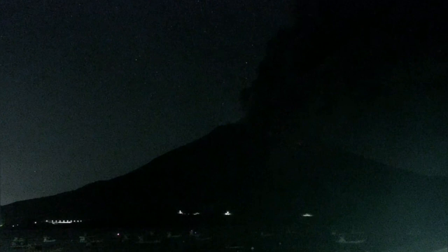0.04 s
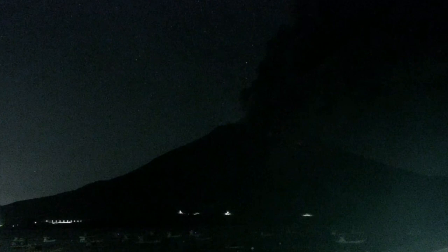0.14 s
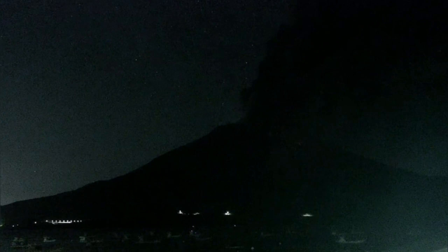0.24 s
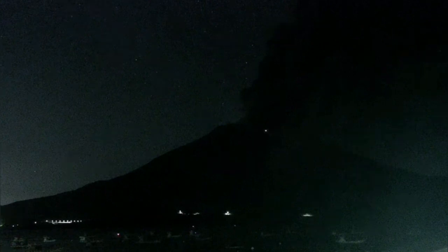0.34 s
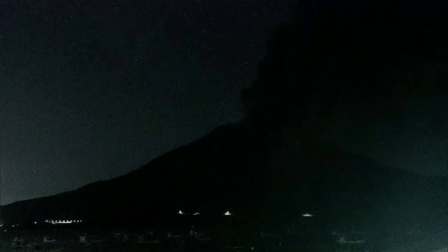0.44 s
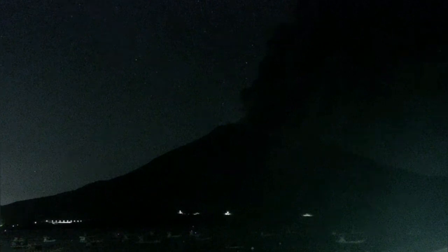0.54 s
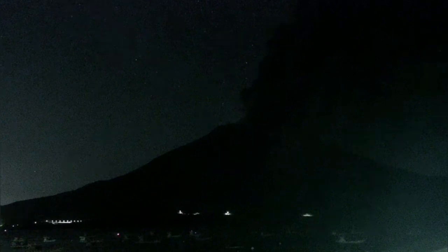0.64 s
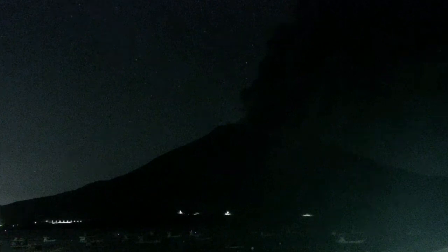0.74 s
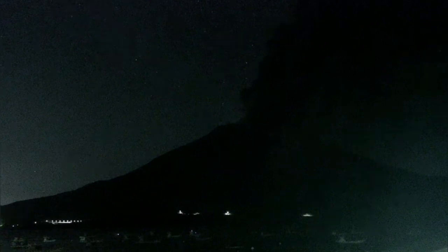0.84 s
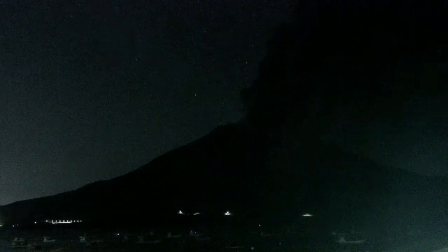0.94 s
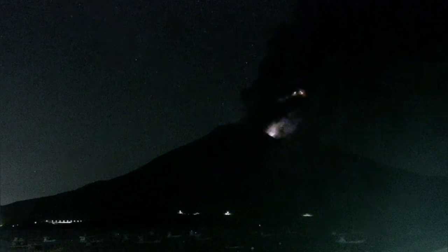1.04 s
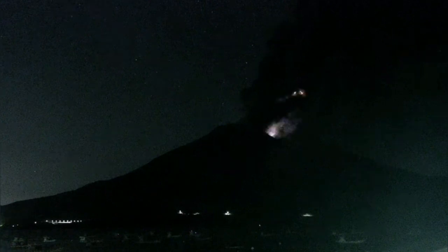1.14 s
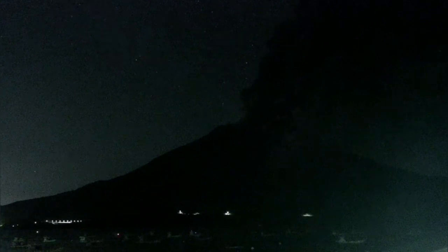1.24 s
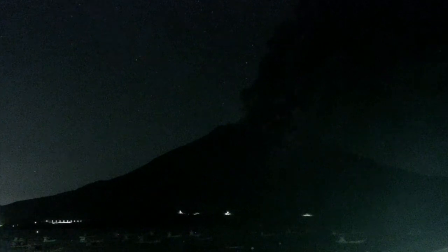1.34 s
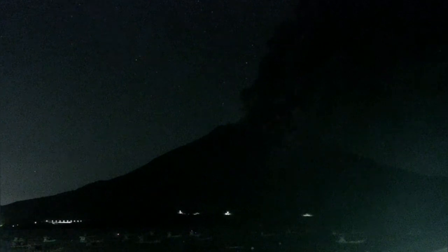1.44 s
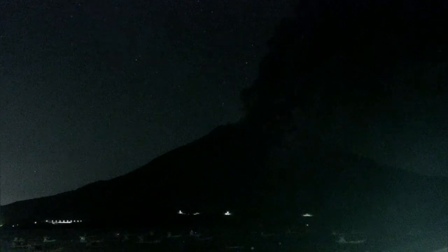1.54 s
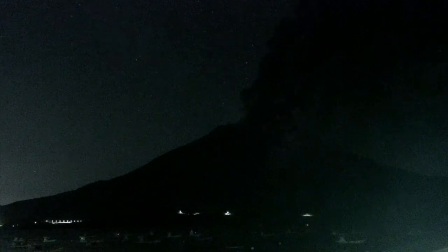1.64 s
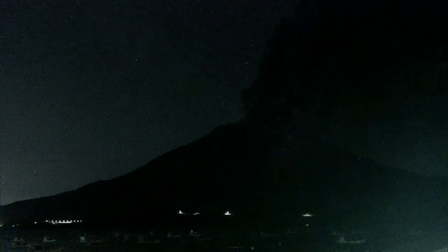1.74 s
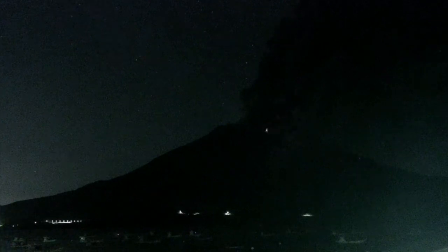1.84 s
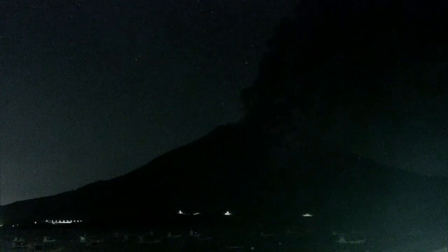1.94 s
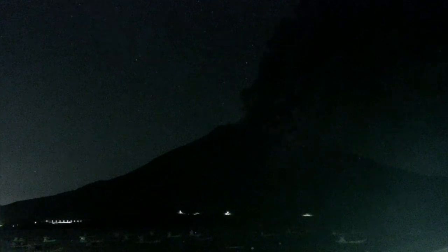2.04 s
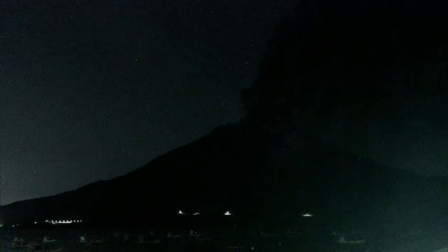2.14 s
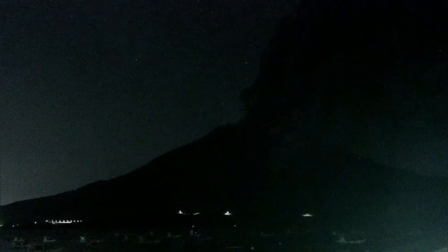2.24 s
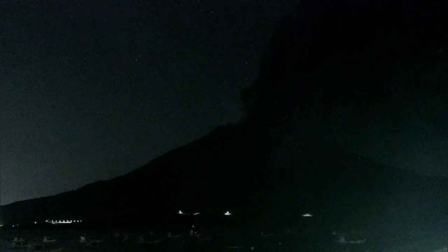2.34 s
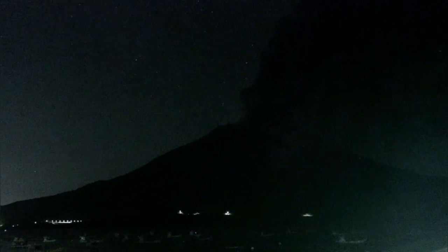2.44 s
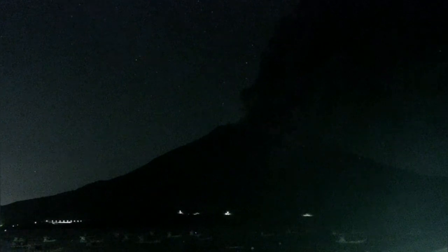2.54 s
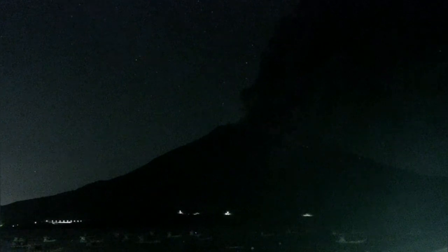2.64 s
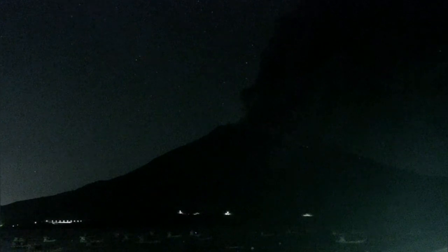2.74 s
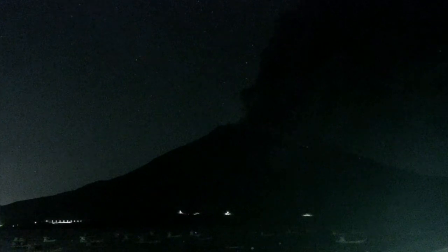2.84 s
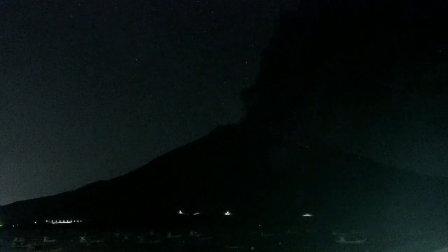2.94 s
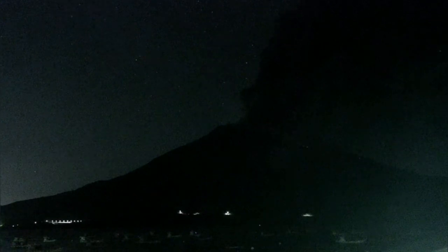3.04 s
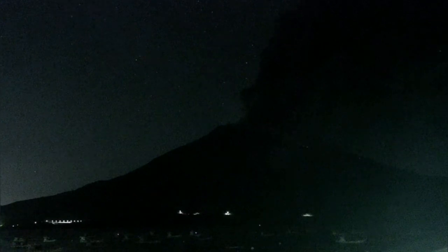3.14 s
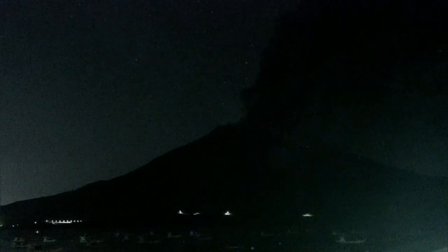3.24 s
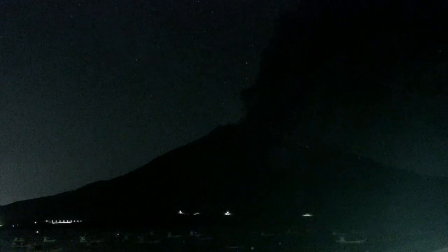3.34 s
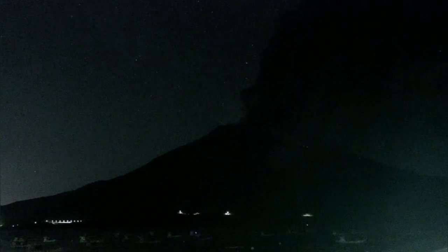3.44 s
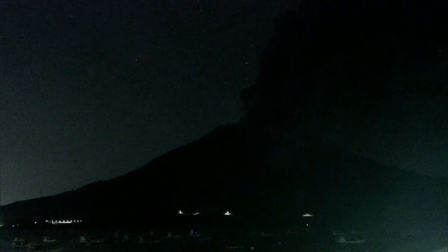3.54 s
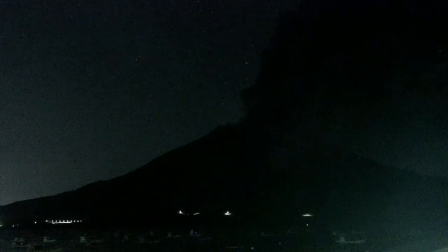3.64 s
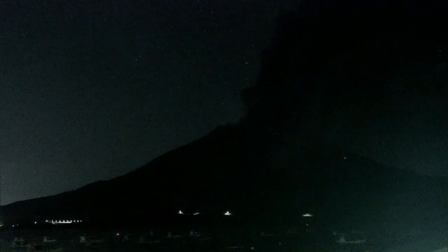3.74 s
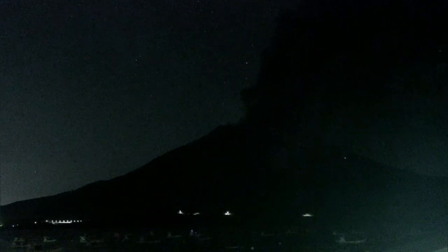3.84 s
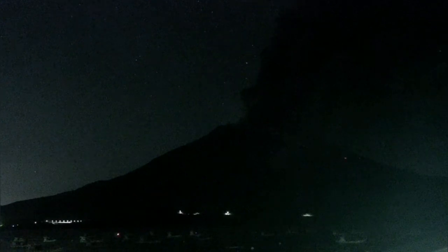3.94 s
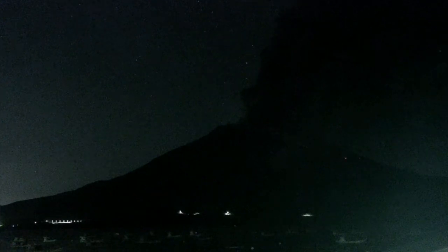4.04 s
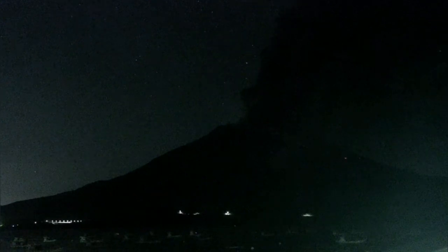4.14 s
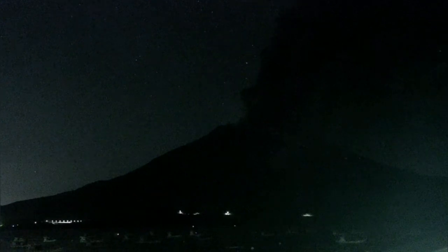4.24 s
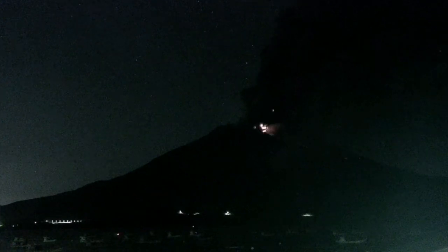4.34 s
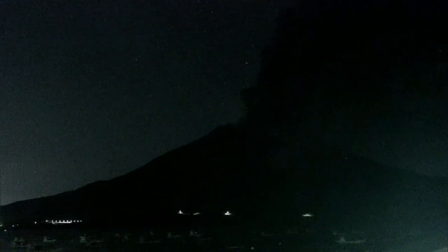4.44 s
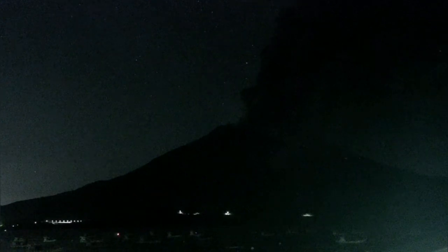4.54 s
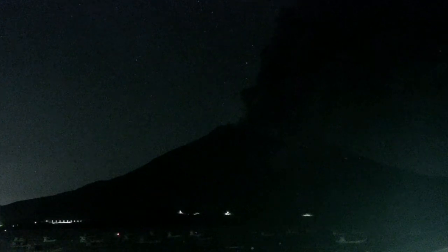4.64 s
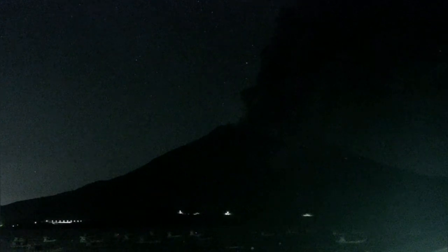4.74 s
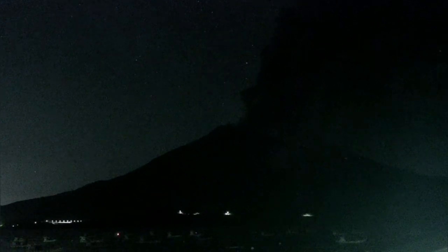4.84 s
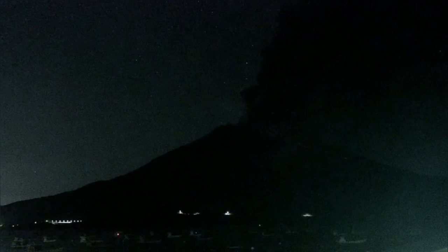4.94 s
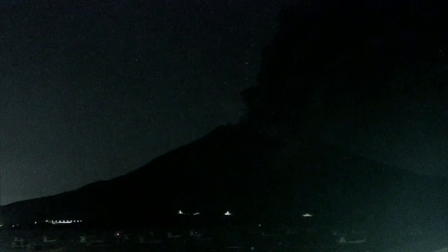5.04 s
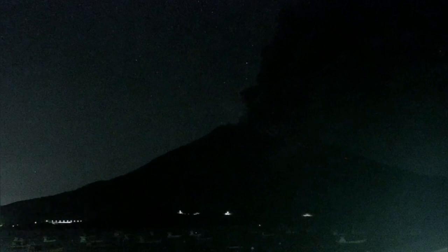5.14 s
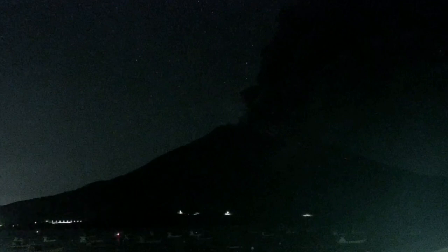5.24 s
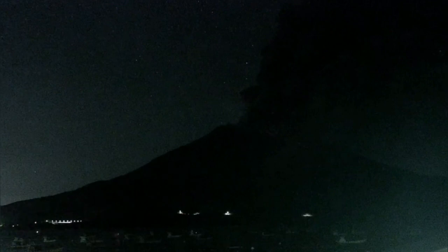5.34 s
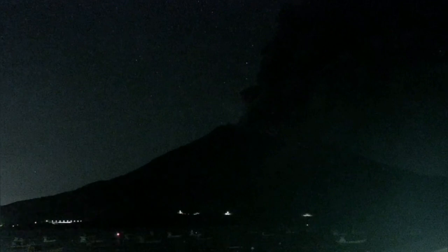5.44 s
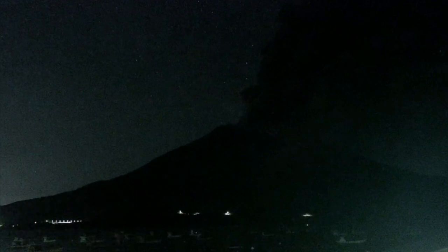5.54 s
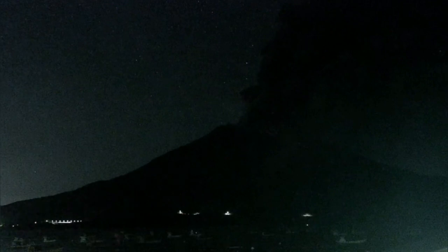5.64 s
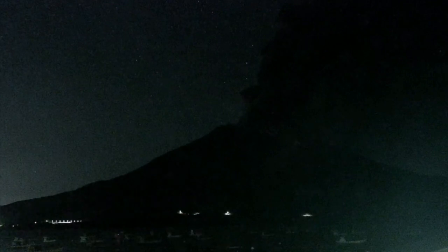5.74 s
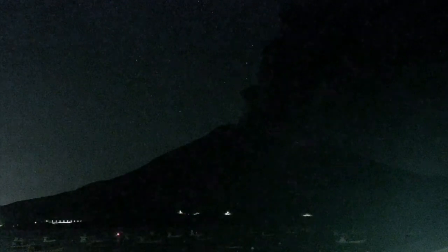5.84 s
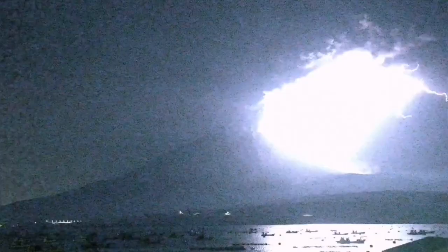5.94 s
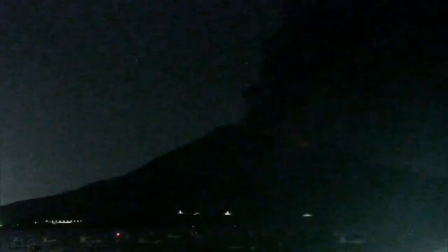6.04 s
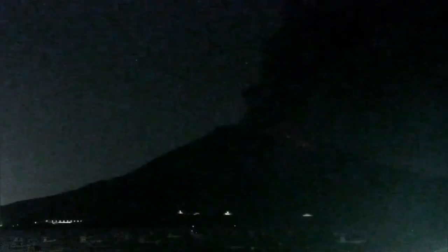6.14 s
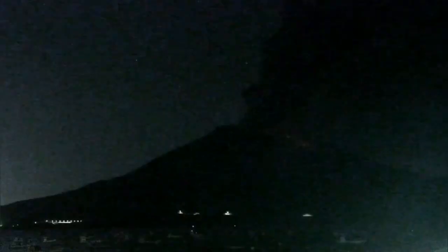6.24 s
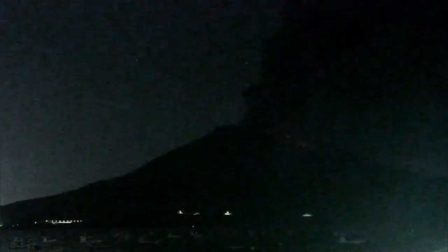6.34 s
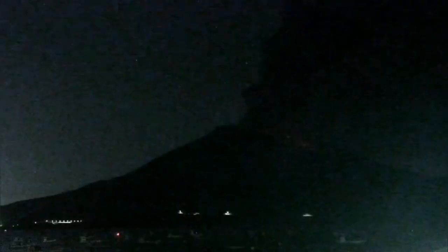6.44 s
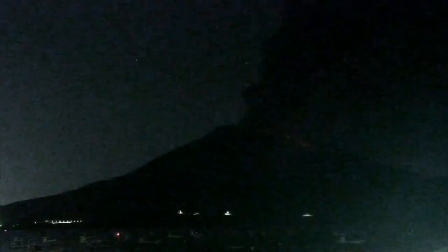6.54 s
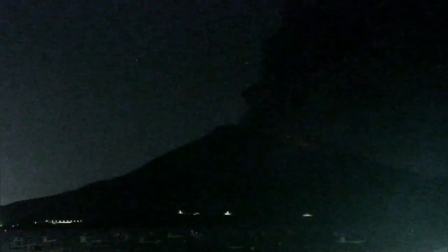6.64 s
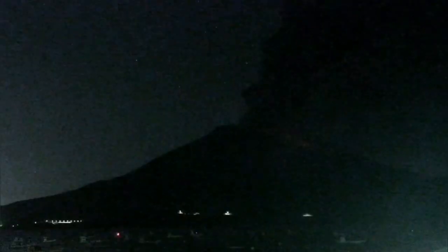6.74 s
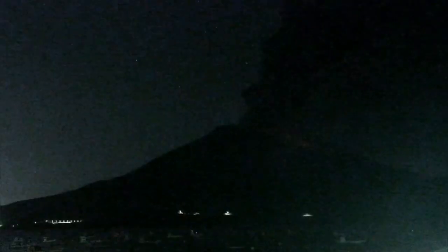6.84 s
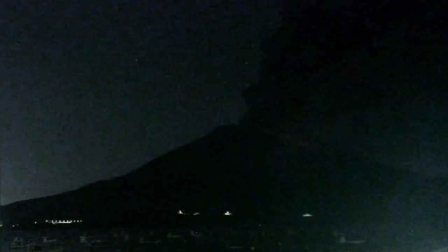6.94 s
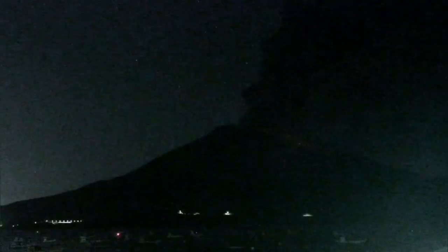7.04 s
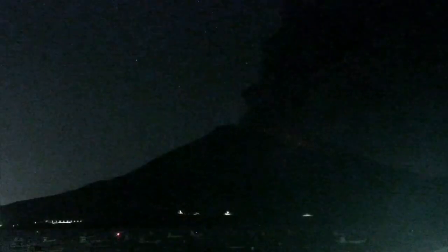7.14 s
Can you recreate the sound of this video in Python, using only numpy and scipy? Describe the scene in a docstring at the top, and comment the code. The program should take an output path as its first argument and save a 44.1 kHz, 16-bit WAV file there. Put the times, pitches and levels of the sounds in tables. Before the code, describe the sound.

Outdoors at night, across water from an erupting volcano. From 0 s a quiet, steady, grainy rush of fine ash falls close by, like dry sand pattering on a hard surface. Irregular sharper ticks, each a short midrange ring with a slight thud and a quick second touch, stand out throughout, with a sparser patch around 2 to 2.8 s and a notably strong tick near 6.3 s. A very faint, low far rumble lies underneath. At about 5.6 s a soft deep roll sets in, swelling in small pulses, and near 6.5 s it roughens to a crackling growl. At 6.7 s thunder bursts out suddenly and extremely loud: hard cracks, dense overlapping peals and a deep bass roll, clipping the microphone. Further peals follow until about 7.15 s, growing duller, with heavy rumbling still present at the end. The narrow-band microphone lacks high treble; a near wall adds a faint quick reflection.

```python
"""Night near an erupting volcano: grains of falling ash patter and tick close by over a faint far rumble.
The ash is dense random impulses and short pings, with single thud-and-ring grains; the rumble is shaped noise.
A low roll of noise sets in, swells and turns to a growl of impulses; then lightning in the plume booms:
peals of filtered impulses, a deep noise roll and single shock fronts.
The narrow-band microphone is overloaded by the boom."""
import sys
import numpy as np
from scipy.fft import rfft, irfft, next_fast_len
from scipy.io import wavfile
from scipy.ndimage import uniform_filter1d, map_coordinates

SR = 44100
rng = np.random.default_rng(int(sys.argv[2]) if len(sys.argv) > 2 else 0)


def wav_out(sig):
    """Save sig, one row per channel (or a flat mono array), as 16-bit PCM at SR to the path in sys.argv[1]."""
    wavfile.write(sys.argv[1], SR, np.round(np.clip(np.atleast_2d(sig).T, -1, 1) * 32767).astype(np.int16))


N = 317065
TIME_S = np.arange(N) / SR
MIC_HZ = 3640  # upper band edge of the microphone
WALL_DELAY_S, WALL_DB = 0.014, -19


def amp(db):
    """dB to gain."""
    return 10 ** (np.asarray(db) / 20)


def unit(x):
    """Scale to rms 1."""
    return x / np.sqrt(np.mean(x ** 2) + 1e-20)


def noise():
    """White Gaussian noise, rms about 1."""
    return rng.standard_normal(N)


def wobble(knots_per_s):
    """Smooth random curve through Gaussian knots."""
    knots = rng.standard_normal(int(N * knots_per_s / SR) + 4)
    return map_coordinates(knots, [TIME_S * knots_per_s])


def filtered(x, response):
    """x times a complex response of frequency."""
    m = 2 * next_fast_len(N // 2 + SR // 2)
    return irfft(rfft(x, m) * response(np.fft.rfftfreq(m, 1 / SR)), m)[:N]


def coloured(x, points):
    """x through a minimum-phase filter of the given spectrum, cut at MIC_HZ, at rms 1."""
    f, db = np.transpose(points)

    def response(hz):
        log_gain = np.log(amp(np.interp(np.log(hz + 1), np.log(f), db)))
        cepstrum = irfft(log_gain)
        half = len(cepstrum) // 2
        cepstrum[1:half] *= 2  # fold onto positive time: causal
        cepstrum[half + 1:] = 0
        return np.exp(rfft(cepstrum)) * (hz < MIC_HZ)
    return unit(filtered(x, response))


def impacts(rate_per_s, spread_db):
    """Random impulses of either sign with capped log-normal sizes, at rms 1."""
    hit = rng.random(N) < rate_per_s / SR
    size = amp(spread_db * np.minimum(rng.standard_normal(N), 2))
    sign = rng.choice([-1, 1], N)
    return unit(hit * size * sign)


def ping(hz, rise_s):
    """Ring of 10 ms whose envelope peaks at 1 after rise_s; one row for each pitch."""
    t = np.arange(SR // 100) / SR
    envelope = t / rise_s * np.exp(1 - t / rise_s)
    return np.sin(2 * np.pi * np.multiply.outer(hz, t)) * envelope


def pings(rate_per_s, centre_hz, spread_db, count=4000):
    """Grains at random times, each with its own pitch and size, at rms 1."""
    gap_s = rng.exponential(1 / rate_per_s, count)
    pitch, size = rng.standard_normal((2, count))
    start = (np.cumsum(gap_s) * SR).astype(int)
    ring_hz = centre_hz * np.exp(0.17 * np.minimum(pitch, 1.5))
    gain = amp(spread_db * np.minimum(size, 1.7))
    waves = ping(ring_hz, rise_s=0.00078) * gain[:, None]
    where = start[:, None] + np.arange(waves.shape[1])
    return unit(np.bincount(where.ravel(), waves.ravel(), N)[:N])


def echoed(x):
    """Add the answer of the near wall: one weaker, delayed copy."""
    return filtered(x, lambda hz: 1 + amp(WALL_DB) * np.exp(-2j * np.pi * hz * WALL_DELAY_S))


def evened(x, span_s):
    """x with its chance swells slower than about span_s taken out."""
    width = int(span_s * SR) + 1
    power = uniform_filter1d(uniform_filter1d(x * x, width), width)
    return x / np.sqrt(np.abs(power) + 1e-6)


def onset(start_s, attack_s):
    """Silence until start_s, then a straight rise to 1 over attack_s."""
    return np.clip((TIME_S - start_s) / attack_s, 0, 1)


def fading(start_s, db_per_s):
    """Gain 1 until start_s, then a steady fall in dB."""
    return amp(-db_per_s * np.maximum(TIME_S - start_s, 0))


# far rumble spectrum: (frequency [Hz], density [dB per Hz])
FAR_SPECTRUM = [(15, -48.5), (25, -29.5), (60, -9), (100, 0.5), (155, 3), (210, -2.5), (300, -3),
                (450, -21.5), (900, -32)]
# far rumble level before FAR_TRIM_DB: (time [s], level [dB])
FAR_LEVEL = [(0, -54.5), (3.7, -54), (4.8, -58)]
FAR_TRIM_DB = 2.0


def far_eruption():
    """The far eruption: low coloured noise on a slow level curve."""
    s, db = np.transpose(FAR_LEVEL)
    level_db = np.interp(TIME_S, s, db) + FAR_TRIM_DB
    return amp(level_db) * coloured(noise(), FAR_SPECTRUM)


# rush and patter spectrum: (frequency [Hz], density [dB per Hz])
PATTER_SPECTRUM = [(100, -12.5), (400, -7.5), (800, -6), (1470, -3), (2100, -1), (2550, 1), (2920, -2.5),
                   (3300, -7.5), (3600, -16)]
FALL_GAIN_DB = -38  # common gain of rush, patter and grit


def ash_fall():
    """Countless far grains merge into a rush; nearer ones clump and stand out as patter and grit."""
    clumps = wobble(knots_per_s=45)
    rush = coloured(noise(), PATTER_SPECTRUM)
    patter = coloured(echoed(impacts(rate_per_s=800, spread_db=5.5)), PATTER_SPECTRUM)
    grit = echoed(pings(rate_per_s=240, centre_hz=2387, spread_db=8.5))
    mix = rush * amp(-4.0 + 0.67 * clumps)
    mix += patter * amp(-4.5 + 1.4 * clumps)
    mix += grit * amp(-9.0 + 1.1 * clumps)
    return amp(FALL_GAIN_DB) * mix


STRAY_PER_S = 7
# (ring level [dB], ring pitch [Hz], thud level before THUD_TRIM_DB [dB])
STRAY_MEAN, STRAY_SPREAD = (-24, 2300, -39), (1.2, 180, 3.3)


def stray_grains(count=120):
    """Rows like those of CLOSE_GRAINS for weaker close grains landing at random."""
    times_s = np.cumsum(rng.gamma(2, 0.5 / STRAY_PER_S, count))
    traits = np.array(STRAY_MEAN) + np.array(STRAY_SPREAD) * rng.standard_normal((count, 3))
    return np.column_stack([times_s, traits])[times_s < N / SR]


# single close grains:
# (time [s], ring level [dB], ring pitch [Hz], thud level before THUD_TRIM_DB [dB])
CLOSE_GRAINS = [(0.1246, -18, 2580, -27.5), (0.236, -17.5, 2260, -29.5), (0.2506, -19, 2310, -33),
                (0.5172, -16.5, 2500, -48), (0.6869, -15.5, 2260, -51), (0.828, -22.5, 2300, -48),
                (0.8429, -14, 2660, -37), (1.1624, -19, 2370, -34), (1.3349, -17.5, 1980, -46),
                (1.5053, -17, 2440, -32), (1.9634, -20.5, 1740, -35), (2.8, -20, 2560, -43),
                (2.966, -22, 2320, -26.5), (3.0554, -21, 2680, -29.5), (3.223, -17.5, 2200, -38),
                (3.2603, -18, 2160, -30.5), (3.273, -15, 2070, -53), (3.322, -20.5, 2700, -34),
                (3.4148, -18, 2240, -46), (3.5672, -16.5, 2300, -35), (3.6344, -17, 2260, -34.5),
                (3.7764, -20, 2000, -43), (3.9215, -15.5, 1950, -44), (4.2825, -19.5, 2230, -35),
                (4.4802, -19.5, 2420, -54), (4.718, -19, 1570, -40), (4.8282, -21.5, 2620, -34),
                (4.927, -15.5, 1580, -26), (5.4852, -17, 2500, -35), (5.5517, -19.5, 1920, -50),
                (5.6038, -19.5, 2400, -28), (6.0788, -16, 2570, -36), (6.2701, -10, 2190, -26.5),
                (6.298, -17.5, 2410, -34)]
THUD_TRIM_DB, THUD_DECAY_S = 13.0, 0.00022
RETOUCH_DB, RETOUCH_MIN_S, RETOUCH_SPREAD_S = -7.0, 0.0022, 0.0016


def near_grains(count=200):
    """Each close grain gives a dull thud and a ring, and touches again a few milliseconds later."""
    out = np.zeros(N + SR)
    grains = [*CLOSE_GRAINS, *stray_grains()]
    for (s, ring_db, ring_hz, thud_db), hop in zip(grains, rng.random(count)):
        ring = amp(ring_db) * ping(ring_hz, rise_s=0.00033)
        u = np.arange(len(ring)) / SR / THUD_DECAY_S
        thud = amp(thud_db + THUD_TRIM_DB) * (1 - u) * np.exp(-u)
        out[round(s * SR):][:len(ring)] += ring + thud
        retouch_s = s + RETOUCH_MIN_S + RETOUCH_SPREAD_S * hop
        out[round(retouch_s * SR):][:len(ring)] += amp(RETOUCH_DB) * ring
    return echoed(out[:N])


# roll and growl spectra: (frequency [Hz], density [dB per Hz])
ROLL_SPECTRUM = [(15, -30.5), (30, -20), (60, -5), (105, 3), (160, 3), (220, -5), (340, -11.5),
                 (480, -35.5), (1000, -45.5)]
GROWL_SPECTRUM = [(100, -14), (330, 1), (600, -6.5), (1200, -12), (3000, -25)]
# swells: (time [s], level over the roll [dB])
ROLL_SWELLS = [(5.73, 2), (5.81, 2.5), (6.09, 1.7), (6.36, 4.7)]
SWELL_WIDTH_S = 0.025
ROLL_START_S, ROLL_ATTACK_S, ROLL_DB = 5.585, 0.017, -39.5
GROWL_START_S, GROWL_ATTACK_S, GROWL_DB = 6.52, 0.039, -38
UNDER_GROWL_DB = -49  # trace of growl from the start of the roll


def low_roll():
    """Low noise sets in, swells and holds; random impulses roughen it to a growl just before the boom."""
    rolling = onset(ROLL_START_S, ROLL_ATTACK_S)
    swell_db = sum(db * np.exp(-((TIME_S - s) / SWELL_WIDTH_S) ** 2) for s, db in ROLL_SWELLS)
    roll = evened(coloured(noise(), ROLL_SPECTRUM), span_s=0.059)
    growling = amp(UNDER_GROWL_DB) * rolling
    growling += amp(GROWL_DB) * onset(GROWL_START_S, GROWL_ATTACK_S)
    growl = coloured(impacts(rate_per_s=1400, spread_db=7.5), GROWL_SPECTRUM)
    return amp(ROLL_DB + swell_db) * rolling * roll + growling * growl


# deep roll spectrum: (frequency [Hz], density [dB per Hz])
BASS_SPECTRUM = [(15, -19), (30, -5.5), (60, -4.5), (105, 0.5), (160, 0), (230, -10.5), (480, -35.5)]
BASS_START_S, BASS_ATTACK_S, BASS_DB, BASS_FALL_DB_PER_S = 6.725, 0.022, -15.5, 5.5


def deep_roll():
    """Deep noise under the peals, building later and lasting longer."""
    rolling = onset(BASS_START_S, BASS_ATTACK_S) * fading(BASS_START_S, BASS_FALL_DB_PER_S)
    return amp(BASS_DB) * rolling * evened(coloured(noise(), BASS_SPECTRUM), span_s=0.049)


PEAL_FALL_DB_PER_S = 51.5


def pealing(starts_s, levels_db, attack_s):
    """Envelope of overlapping peals: each rises quickly and dies away, and their powers add."""
    peals = [amp(db) * onset(s, attack_s) * fading(s, PEAL_FALL_DB_PER_S)
             for s, db in zip(starts_s, levels_db)]
    return np.linalg.norm(peals, axis=0)


AIR_HZ, DULLING_DB_PER_S = 2005, 25.5


def dulled(x, start_s):
    """The air takes ever more treble from start_s on, as the sound comes from farther away."""
    low = filtered(x, lambda hz: 1 / (1 + (hz / AIR_HZ) ** 6))
    return low + (x - low) * fading(start_s, DULLING_DB_PER_S)


# peals from ever farther parts of the channel: (time [s], body level [dB], crash level [dB])
PEALS = [(6.701, -7, -15), (6.742, -14.5, -7.5), (6.853, -4, -18), (6.905, -28, -16), (6.995, -14.5, -26),
         (7.045, -19, -12.5), (7.155, -13, -14)]
# body, crash and crackle spectra: (frequency [Hz], density [dB per Hz])
BODY_SPECTRUM = [(15, -41.5), (28, -30), (55, -24.5), (95, -12), (155, -3.5), (200, -4), (245, 3),
                 (270, -4), (298, 0.5), (345, 0), (430, -4), (600, -21.5), (1200, -56)]
CRASH_SPECTRUM = [(250, -49.5), (470, 0), (700, 0), (1000, -4), (1350, -9.5), (1900, -16.5), (3600, -62.5)]
CRACKLE_SPECTRUM = [(800, -34.5), (1450, 4), (2000, 1.5), (2800, 1.5), (3600, -6.5)]
BODY_ATTACK_S, CRASH_ATTACK_S = 0.0077, 0.018
CRACKLE_DB = -8.5  # relative to crash


def thunder_peals():
    """Shocks from all along the lightning channel pile up in peals; their crackle grows duller."""
    starts_s, body_db, crash_db = np.transpose(PEALS)
    crashing = pealing(starts_s, crash_db, CRASH_ATTACK_S)
    body = evened(coloured(impacts(rate_per_s=2500, spread_db=-0.5), BODY_SPECTRUM), span_s=0.014)
    crash = evened(coloured(impacts(rate_per_s=1500, spread_db=1.5), CRASH_SPECTRUM), span_s=0.015)
    crackle = coloured(impacts(rate_per_s=2000, spread_db=1.5), CRACKLE_SPECTRUM)
    mix = pealing(starts_s, body_db, BODY_ATTACK_S) * body
    mix += crashing * crash
    mix += amp(CRACKLE_DB) * crashing * dulled(crackle, starts_s[0])
    return mix


# strongest fronts: (time [s], peak level [dB], half width [s])
SHOCKS = [(6.705, -8, 0.00059), (6.7309, -3.5, 0.00081), (6.7413, -1, 0.00079), (6.7495, 7, 0.00019),
          (6.7554, 21, 0.00018), (6.7725, 4.5, 0.00019), (6.7952, 0.5, 0.00023), (6.8319, 5.5, 0.00055),
          (6.9044, -5, 0.0013), (6.9177, -5.5, 0.00075), (6.923, -0.5, 0.00015), (7.005, -2.5, 0.00067),
          (7.0186, 0.5, 0.0004), (7.0522, 3, 0.00044)]


def shock_fronts():
    """Single fronts: N-waves rounded by the long way through the air."""
    fronts = np.zeros(N)
    for s, db, width_s in SHOCKS:
        near = slice(round((s - 5 * width_s) * SR), round((s + 5 * width_s) * SR))
        u = (TIME_S[near] - s) / width_s
        fronts[near] += amp(db) * u * np.exp((1 - u * u) / 2)
    return fronts


def scene():
    """Volcano far off, ash close by, then the thunder."""
    background = far_eruption() + ash_fall() + near_grains()
    thunder = deep_roll() + thunder_peals() + shock_fronts()
    return (background + low_roll() + thunder)[None]


SATURATION_LEVEL, MIC_SLOPE_DB_PER_HZ = 1.35, 0.2
HISS_DB, TOP_HZ = -92, 16000


def record(dry):
    """Soft-saturating narrow-band microphone, then a stage that clips at full scale and hisses faintly."""
    pressed = dry[0] / (1 + np.abs(dry[0] / SATURATION_LEVEL) ** 6) ** (1 / 6)
    narrow = filtered(pressed, lambda hz: amp(-np.clip((hz - MIC_HZ) * MIC_SLOPE_DB_PER_HZ, 0, 120)))
    hiss = amp(HISS_DB) * noise()
    return filtered(np.clip(narrow, -1, 1) + hiss, lambda hz: hz < TOP_HZ)[None]


dry = scene()
out = record(dry)
wav_out(out)
```